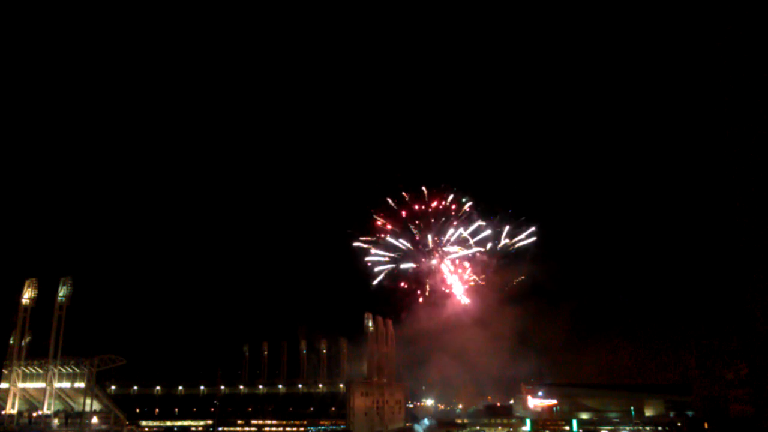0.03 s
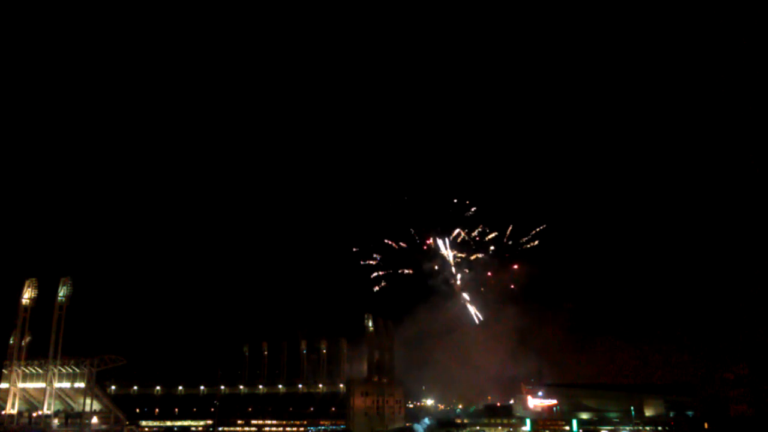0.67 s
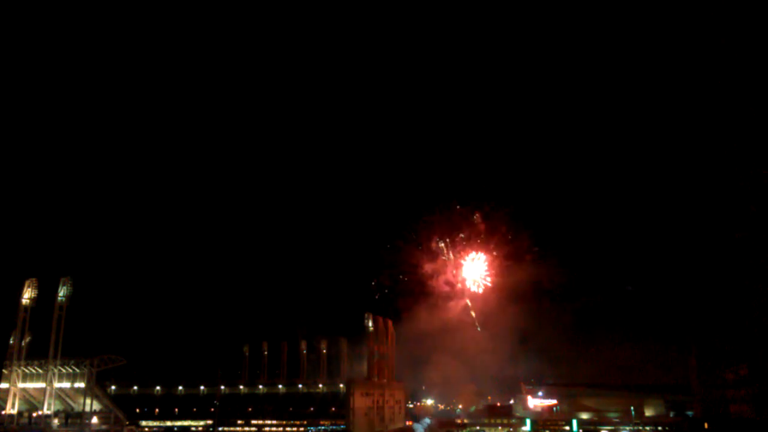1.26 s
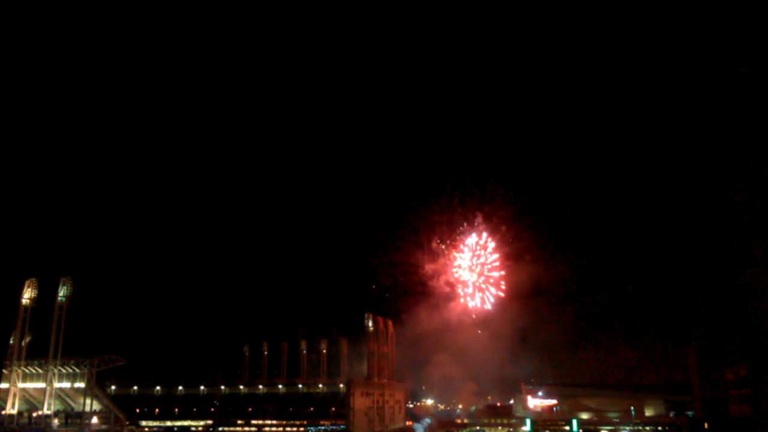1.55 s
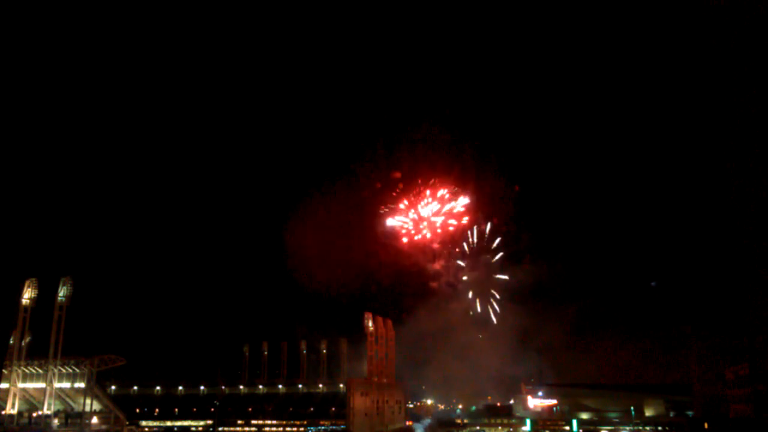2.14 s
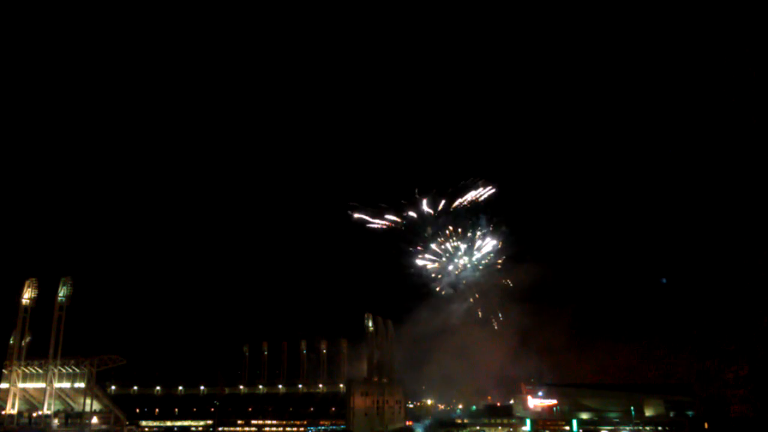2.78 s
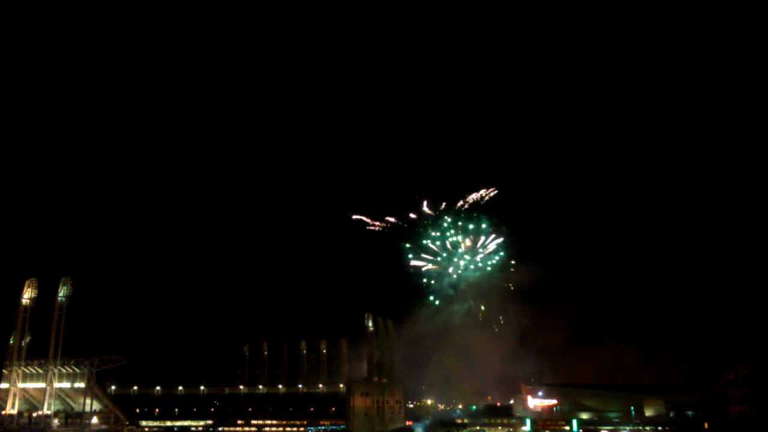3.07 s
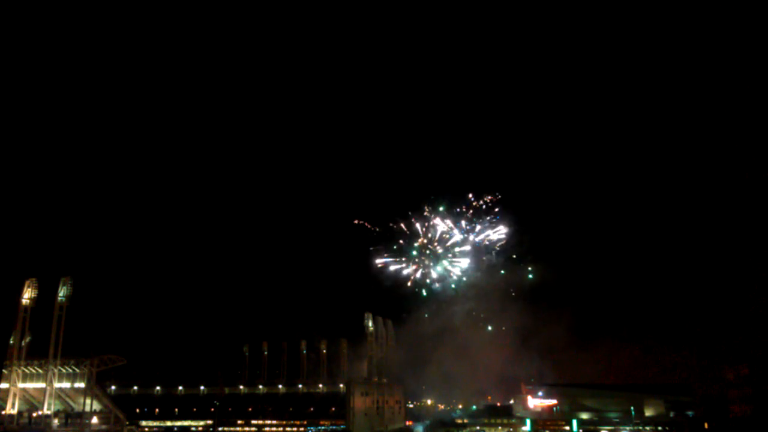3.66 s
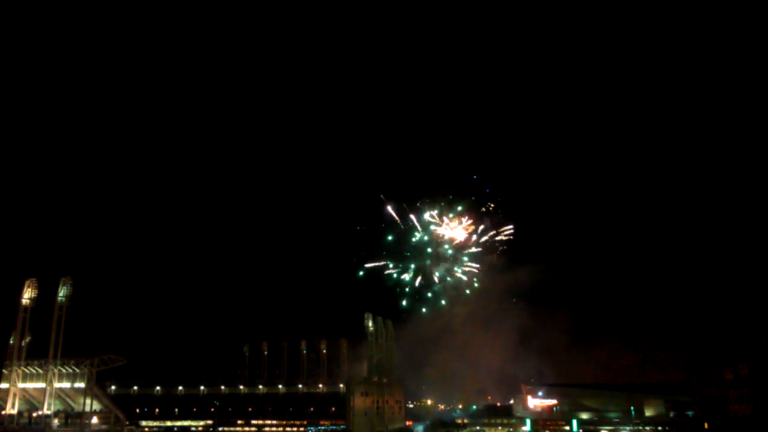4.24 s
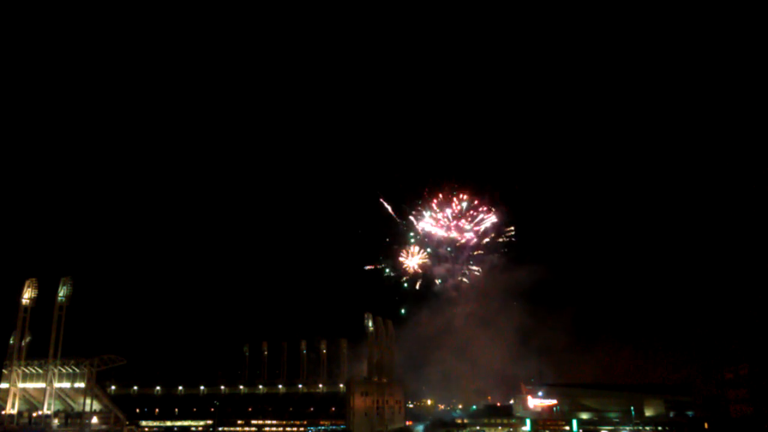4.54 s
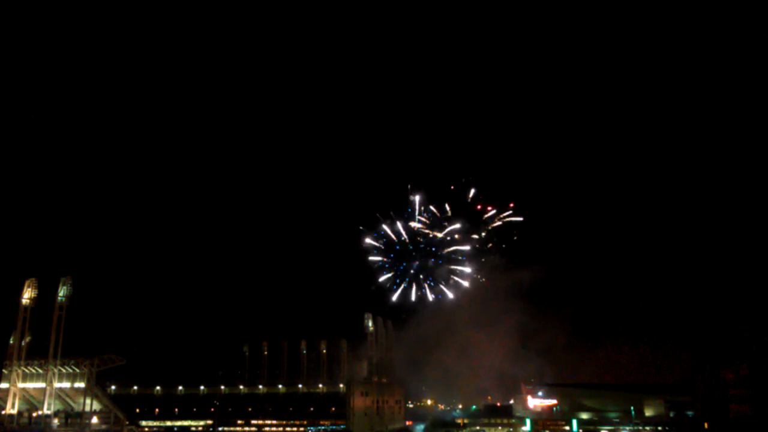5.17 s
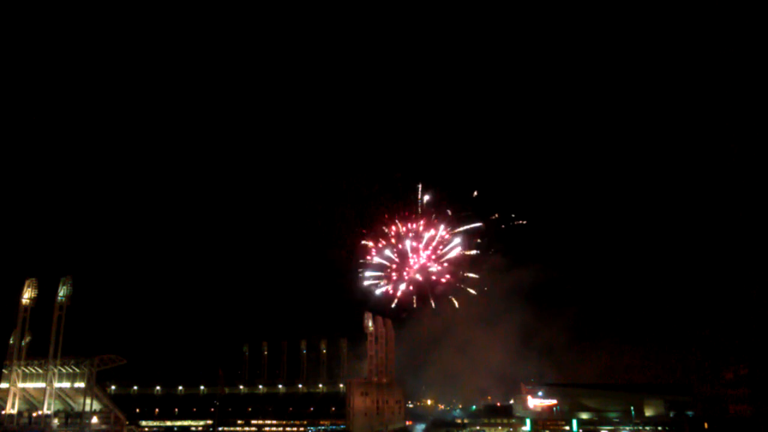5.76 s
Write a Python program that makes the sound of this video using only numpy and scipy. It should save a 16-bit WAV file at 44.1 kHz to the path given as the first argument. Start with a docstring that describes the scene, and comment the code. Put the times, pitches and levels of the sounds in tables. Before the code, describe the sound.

Heard from indoors, far-off aerial fireworks bang singly and in pairs, with fainter pops and echoes rumbling across the city.

```python
"""A room in a city at night, one microphone indoors, aerial shells bursting far off. Each bang rings briefly in
the room, overloads the microphone and slaps back from a nearby wall; then the city answers with a roll from the
near streets and later swells from far buildings. Fainter reports, smeared by the buildings, fall in between,
some of them late echoes of the bangs off far walls, and a thin high sizzle comes and goes."""
import sys
import numpy as np
from scipy import signal
from scipy.fft import rfft, irfft, next_fast_len
from scipy.io import wavfile
from scipy.ndimage import map_coordinates

SR = 44100
rng = np.random.default_rng(int(sys.argv[2]) if len(sys.argv) > 2 else 0)


def transcribe(signal):
    """Save signal, clipped to [-1, 1], as a 16-bit WAV file at the path in sys.argv[1]."""
    frames = np.atleast_2d(signal).T
    limited = np.clip(frames, -1, 1)
    pcm = np.round(limited * 32767).astype(np.int16)
    wavfile.write(sys.argv[1], SR, pcm)


N = 265041

# Distant shell bursts. Each row: start in seconds, level in dB before overload, t60 in seconds,
# ring pitch in Hz, its lift in dB, second ring in Hz, its lift in dB, room boom in dB, boom pitch in Hz,
# wall echo delay in seconds, echo gain in dB, tilt in dB per octave, bass lift in dB,
# crackle in dB, roll from the near streets in relative dB.
SHELL_BURSTS = [(0.0683, -4.5, 0.042, 571, 5.5, 1176, 8.5, -27, 618, 0.041, -3, 0.9, -6, -27, -21),
                (0.1228, -3.5, 0.057, 1577, 2.5, 2284, 4.5, -15, 496.8, .040, -15, 2, -3.5, -27.5, -18.5),
                (0.7750, -2.5, 0.05, 1070, 6.5, 2794, 4, -24.5, 616, 0.032, -4.5, 2.5, -0.5, -24, -18),
                (2.0983, -6.5, 0.074, 1204, 6, 610, 5.5, -19, 624, 0.037, -2, 3.5, 6.5, -28, -20.5),
                (2.5994, -3.5, 0.064, 1600, 10.5, 830, 8.5, -12.5, 421.2, 0.047, -13.5, 1.5, -2.5, -23.5, -19),
                (3.2239, 0, 0.06, 1087, 2.5, 2745, 4.5, -21, 608, .0385, -8, 2.5, 6.5, -24, -21),
                (3.9644, -3.5, 0.082, 826, 5.5, 1750, 0, -14, 530, 0.046, -13, 1.1, -2.5, -26.5, -19.5),
                (4.1524, -9, 0.097, 2340, 6.5, 1070, 3.5, -25, 619, .044, -6.5, 1, -0.5, -42.5, -22),
                (5.1030, -3.5, 0.055, 1113, 5.5, 1270, 4.5, -14.5, 603, .049, -14.5, 2.6, -2, -37, -18.5),
                (5.2436, -4.5, 0.07, 1797, 7, 456, 6, -15.5, 493, 0.046, -31, 0.1, -5, -33, -19.5)]
# Rolls from far buildings. Each row: start in seconds, hold in seconds, deep t60 in seconds,
# deep level in dB, bright t60 in seconds, bright level in dB.
FAR_ROLLS = [(0.34, 0.23, 2.2, -21, 1.8, -30.5), (0.988, 0.14, 3.1, -25.5, 4, -36.5),
             (2.203, 0.11, 1.7, -24.5, 1.7, -37), (2.828, 0.22, 2.5, -23, 5.2, -34.5),
             (3.425, 0.049, 5, -25, 5, -39.5), (4.2, 0.034, 3.65, -21.5, 3.2, -30),
             (5.445, 0.28, 1.33, -21.5, 1.2, -34.5)]
# Fainter reports, some of them late echoes of the bangs off far walls. Each row: start in seconds, level in dB,
# smear t60 in seconds, ring pitch in Hz, tilt in dB per octave, room boom in dB.
FAINT_REPORTS = [(0.051, -22, 0.022, 1100, -1, -29), (0.352, -23, 0.14, 1730, -5.5, -25),
                 (0.443, -23, 0.14, 1520, -3.5, -24.5), (0.522, -23, 0.12, 1680, -3, -37),
                 (0.564, -25.5, 0.11, 1100, 2, -51), (0.588, -18.5, 0.22, 1600, 0.5, -31),
                 (0.984, -25.5, 0.27, 1110, -1, -38), (1.134, -26, 0.094, 1600, -1, -40),
                 (1.548, -37.5, 0.11, 900, 0, -29), (1.6658, -28, 0.16, 1360, -1, -33),
                 (1.688, -27.5, 0.13, 1360, 1.5, -35.5), (1.888, -29, 0.14, 1400, -3.5, -50),
                 (2.867, -29, 0.05, 1500, -1, -41), (2.895, -18.5, 0.33, 920, -3, -29),
                 (2.94, -26.5, 0.089, 1000, -0.5, -31), (3.0043, -32, 0.093, 904, -8.5, -25.5),
                 (3.081, -22.5, 0.18, 1510, -2, -41), (3.438, -23.5, 0.3, 1060, -1.5, -25),
                 (3.854, -25.5, 0.11, 2130, 10, -22), (3.8618, -25, 0.085, 2100, 6.5, -41),
                 (4.2965, -35.5, 0.062, 1123, 2, -27), (4.349, -19.5, 0.14, 1490, -9.5, -32),
                 (4.401, -28.5, 0.046, 1090, -6, -23), (4.727, -22.5, 1, 1490, -1.5, -47),
                 (4.9458, -27.5, 0.22, 1080, -1, -34), (5.56, -23, 0.34, 1430, -3.5, -14),
                 (5.676, -30, 0.03, 1420, -5.5, -42.5), (5.733, -22.5, 0.13, 870, 1, -35),
                 (5.866, -36, 0.06, 1100, -9, -48), (5.9855, -28, 0.1, 1380, -2.5, -40)]
# Spells of high sizzle. Each row: start in seconds, hold in seconds, level in dB.
SIZZLE_SPELLS = [(0.065, 0.065, -42), (0.228, 0.0063, -52.5), (0.291, 0.0071, -49.5), (0.434, 0.016, -35),
                 (0.868, 0.09, -47.5), (0.97, 0.125, -35), (1.149, 0.13, -49), (1.164, 0.05, -29.5),
                 (1.362, 0.009, -43.5), (1.379, 0.011, -38), (1.876, 0.044, -37.5), (2.23, 0.073, -32),
                 (2.32, 0.11, -31.5), (2.416, 0.085, -32.5), (2.507, 0.12, -33.5), (2.605, 0.035, -29.5),
                 (2.664, 0.037, -42), (2.724, 0.017, -46), (2.776, 0.011, -46), (2.804, 0.013, -55.5),
                 (2.873, 0.0091, -48.5), (2.936, 0.011, -47.5), (3.871, 0.024, -38), (3.923, 0.05, -32.5),
                 (4.212, 0.019, -51.5), (4.865, 0.015, -33), (4.929, 0.015, -33.5), (5.206, 0.014, -33.5),
                 (5.869, 0.06, -33)]
# Resonances of the room around the microphone. Each row: centre in Hz, width in Hz, lift in dB.
ROOM_MODES = [(218.4, 23, 2.5), (245.3, 7.5, 7), (267.4, 7, 10.5), (367.2, 17, 7), (428, 31.7, 5.5),
              (496.4, 18, 10), (574, 66, 5.5), (684, 29, -5), (1075, 40, 4), (1248, 38, 4.5),
              (1346, 45, -5.5), (1507, 158, 7.5), (1748, 110, 8), (1987, 85, 5), (2282, 110, 5),
              (2630, 50, 2)]

# The tone of each sound from indoors. Each row: frequency in Hz, relative level in dB.
DEEP_ROLL_TONE = [(25, -80.5), (50, -43), (75, -41), (110, -30), (150, -16), (195, -14), (245, -3),
                  (310, -1.5), (400, 3.5), (520, -8), (650, -4), (850, -12.5), (1400, -70.5), (4000, -86.5)]
BRIGHT_ROLL_TONE = [(60, -74.5), (350, -27), (700, 4), (1100, 1.5), (1350, -2.5), (1600, -8), (2100, -9.5),
                    (3000, -14), (4000, -29), (5500, -64), (12000, -95.5)]
SIZZLE_TONE = [(3000, -77), (7500, -53.5), (9000, -24.5), (11500, -10.5), (12700, -1.5), (13900, 8.5),
               (15300, -1.5), (16200, -6.5)]
HISS_TONE = [(3000, -13), (7500, -24), (10500, -19), (12500, -11), (14200, 9), (15000, -11.5),
             (16200, -15.5)]
DULL_TONE = [(100, -49), (400, 4.5), (900, 7.5), (1600, -1.5), (2900, -9), (4000, -26.5), (5500, -58),
             (9000, -74)]  # faint reports and the tails of bangs
BLAST_TONE = [(25, -69), (60, -18), (100, -11.5), (200, -5.5), (380, -2.5), (550, 5), (720, 1.5),
              (1100, -2.5), (1800, -9.5), (2800, -13), (4000, -25), (5600, -41.5), (12000, -85.5)]
WALL_ECHO_TONE = [(40, -61), (120, -16), (380, -10), (560, 3), (1000, 0.5), (1800, -15), (2900, -11),
                  (4000, -22), (5500, -60.5), (9000, -85)]
CRACKLE_TONE = [(600, -42), (2000, -1), (3200, 5), (5000, -4), (8000, -12), (12000, -18), (16000, -33)]


def amp(db):
    """Decibels to gain."""
    return 10 ** (np.asarray(db) / 20)


def unit(x):
    """x at rms 1."""
    return x / np.sqrt(np.mean(x ** 2) + 1e-20)


def unit_energy(x):
    """x with as much energy as 10 ms at rms 1."""
    return x / np.linalg.norm(x) * np.sqrt(SR / 100)


def fade(t, t60):
    """A decay of 60 dB in t60 seconds."""
    return np.exp(-np.log(1000) * t / t60)


def swell(t, rise, hold, t60):
    """An envelope from t = 0 that rises, holds and dies away; times in seconds."""
    return np.clip(t / rise, 0, 1) * fade(np.maximum(t - rise - hold, 0), t60)


def wobble(rate):
    """A smooth random curve of rms 1, rate knots a second."""
    knots = rng.standard_normal(int(N * rate / SR) + 4)
    return unit(map_coordinates(knots, [np.arange(N) * rate / SR]))


def add(track, start, sound):
    """Mix a sound into the track, start seconds in."""
    rest = track[max(round(start * SR), 0):]
    rest[:len(sound)] += sound[:len(rest)]


def tilted(tone, tilt_db):
    """A tone tilted by tilt_db per octave above 600 Hz."""
    return [(hz, db + tilt_db * np.log2(max(hz / 600, 1))) for hz, db in tone]


def coloured(x, tone, resonances=()):
    """x through a causal filter: a broad tone with resonant peaks on it."""
    size = 2 * next_fast_len(len(x) // 2 + 4096)
    hz = np.fft.rfftfreq(size, 1 / SR)
    tone_hz, tone_db = np.transpose(tone)
    db = np.interp(np.log(hz + 1), np.log(tone_hz + 1), tone_db)
    db += sum(lift / (1 + (2 * (hz - centre) / width) ** 2) for centre, width, lift in resonances)
    # Minimum phase: nothing rings before it is struck.
    cepstrum = irfft(np.log(amp(db)), size)
    cepstrum[1:size // 2] *= 2
    cepstrum[size // 2 + 1:] = 0
    return irfft(rfft(x, size) * np.exp(rfft(cepstrum)), size)[:len(x)]


def patter(rate, spread_db, t60, steady):
    """White noise in uneven puffs, rate a second, each starting sharply and dying onto a steady bed."""
    starts = (rng.random(N) < rate / SR) * amp(spread_db * rng.uniform(-1.7, 1, N)) ** 2
    puff = fade(np.arange(SR // 4) / SR, t60) ** 2
    power = np.abs(signal.fftconvolve(starts, puff)[:N])
    return rng.standard_normal(N) * np.sqrt(power / power.mean() + steady)


def roll(far_dbs, far_t60s, far_rise, near_db, near_rise, near_hold, near_t60,
         earlier_db, earlier_t60, floor_db):
    """Strength of the echoes: near and far rolls over earlier shells dying away and the steady city."""
    t = np.arange(0, N, 64) / SR
    power = amp(floor_db) ** 2 + (amp(earlier_db) * fade(t, earlier_t60)) ** 2
    for start, *_, db in SHELL_BURSTS:
        power += (amp(db + near_db) * swell(t - start, near_rise, near_hold, near_t60)) ** 2
    for (start, hold, *_), db, t60 in zip(FAR_ROLLS, far_dbs, far_t60s):
        power += (amp(db) * swell(t - start, far_rise, hold, t60)) ** 2
    return np.interp(np.arange(N) / SR, t, np.sqrt(power))


def city_rumble():
    """Countless echoes reach the room: a deep roll and a brighter scatter, mostly from far off."""
    deep = coloured(patter(rate=110, spread_db=-0.5, t60=0.2, steady=0.34), DEEP_ROLL_TONE, ROOM_MODES)
    scatter = patter(rate=160, spread_db=3.5, t60=0.29, steady=0.056)
    bright = coloured(scatter, BRIGHT_ROLL_TONE, ROOM_MODES)
    *_, deep_t60s, deep_dbs, bright_t60s, bright_dbs = np.transpose(FAR_ROLLS)
    deep_roll = roll(deep_dbs, deep_t60s, far_rise=0.059,
                     near_db=-1, near_rise=0.028, near_hold=0.069, near_t60=0.98,
                     earlier_db=-19, earlier_t60=0.69, floor_db=-34.5)
    bright_roll = roll(bright_dbs, bright_t60s, far_rise=0.02,
                       near_db=-13.5, near_rise=0.0044, near_hold=0.057, near_t60=0.91,
                       earlier_db=-28, earlier_t60=0.85, floor_db=-41)
    return deep_roll * unit(deep) + bright_roll * unit(bright)


def high_sizzle(hiss_db, whine_hz, whine_db):
    """A very high sizzle flares in short spells over a faint steady hiss and a wavering whine."""
    t = np.arange(N) / SR
    flare_power = sum((amp(db) * swell(t - start, rise=0.004, hold=hold, t60=0.045)) ** 2
                      for start, hold, db in SIZZLE_SPELLS)
    flutter = unit(amp(2.8 * wobble(rate=70)))
    fizz = unit(coloured(patter(rate=200, spread_db=12, t60=0.015, steady=0.67), SIZZLE_TONE))
    hiss = amp(hiss_db) * unit(coloured(rng.standard_normal(N), HISS_TONE))
    phase = 2 * np.pi * np.cumsum(whine_hz + 2 * wobble(rate=14)) / SR
    whine = amp(whine_db + 2.5 * wobble(rate=25)) * np.sin(phase)
    return np.sqrt(flare_power) * flutter * fizz + hiss + whine


def reflections(tone, resonances, attack, t60, hold=0):
    """A dense cluster of reflections that swells, holds and dies; times in seconds."""
    t = np.arange(SR // 3) / SR
    envelope = (1 - np.exp(-t / attack)) * fade(np.maximum(t - hold, 0), t60)
    return unit_energy(coloured(envelope * rng.standard_normal(len(t)), tone, resonances))


def faint_reports():
    """Reports that reach the microphone only by detours: a soft pop, a smear and a boom in the room."""
    out = np.zeros(N)
    for start, db, t60, ring_hz, tilt_db, boom_db in FAINT_REPORTS:
        tone = tilted(DULL_TONE, tilt_db)
        resonances = ROOM_MODES + [(ring_hz, 400, 5)]
        pop = amp(-5) * reflections(tone, resonances, attack=0.001, t60=0.04)
        smear = amp(0.5) * reflections(tone, resonances, attack=0.001, t60=t60)
        add(out, start, amp(db) * (pop + smear))
        add(out, start, amp(boom_db) * room_boom(start_hz=366, detune=0.087, rough=1.7, sinks_to=0.85))
    return out


def room_boom(start_hz, detune, rough, sinks_to=0.59):
    """A rough low ring that sinks to a share of its pitch as the lower room resonances take over."""
    t = np.arange(SR // 3) / SR
    glide = sinks_to + (1 - sinks_to) * np.exp(-t / 0.0334)
    hz = start_hz * glide * (1 + detune * rng.standard_normal())
    knots = rng.standard_normal((2, 100))
    grain = map_coordinates(knots[0], [t * 160]) + 1j * map_coordinates(knots[1], [t * 160])
    cycles = np.cumsum(hz) / SR + rng.random()
    wave = np.real((1 + rough * grain) * np.exp(2j * np.pi * cycles))
    return swell(t, rise=0.02, hold=0.035, t60=0.098) * wave / np.sqrt(1 + 2 * rough ** 2)


def shock_wave(tone, rings, attack, hold, t60, tail_db, tail_t60):
    """One shock wave entering the room: a crack, then a duller tail as the walls soak up the treble."""
    crack = reflections(tone, ROOM_MODES + rings, attack, t60, hold)
    tail = reflections(DULL_TONE, ROOM_MODES, attack=0.012, t60=tail_t60)
    return crack + amp(tail_db) * tail


def crackle(ticks_per_s=230):
    """A brief, gritty treble crackle on each overloaded bang."""
    t = np.arange(SR // 10) / SR
    ticks = (rng.random(len(t)) < ticks_per_s / SR) * rng.standard_normal(len(t))
    grit = unit(ticks) + 0.6 * rng.standard_normal(len(t))
    return unit_energy(coloured(grit * swell(t, rise=0.0025, hold=0.0085, t60=0.045), CRACKLE_TONE))


def shell_bangs():
    """Each far burst arrives directly, then duller off a nearby wall; both arrivals boom in the room."""
    out = np.zeros(N)
    for (start, db, t60, ring_hz, ring_db, second_hz, second_db, boom_db, boom_hz,
         delay, echo_db, tilt_db, bass_db, crackle_db, _) in SHELL_BURSTS:
        rings = [(ring_hz, 130, ring_db), (second_hz, 150, second_db)]
        tone = [(hz, level + bass_db * (hz < 250)) for hz, level in tilted(BLAST_TONE, tilt_db)]
        direct = shock_wave(tone, rings, attack=0.00025, hold=0.0029, t60=t60,
                            tail_db=-12.5, tail_t60=0.23)
        echo = shock_wave(WALL_ECHO_TONE, rings, attack=0.00082, hold=0.002, t60=0.079,
                          tail_db=-28.5, tail_t60=0.95)
        add(out, start, amp(db) * direct + amp(boom_db) * room_boom(boom_hz, detune=0.02, rough=0.78))
        add(out, start, amp(crackle_db) * crackle())
        # The wall echo crackles much more faintly.
        add(out, start + delay, amp(crackle_db + echo_db - 17.5) * crackle())
        echo_boom = amp(boom_db) * room_boom(boom_hz, detune=0.025, rough=0.7)
        add(out, start + delay, amp(echo_db) * (amp(db) * echo + echo_boom))
    return out


def scene():
    """Bangs, fainter reports, rumble and sizzle meet at one microphone in the room."""
    fireworks = shell_bangs() + faint_reports() + city_rumble()
    return (fireworks + high_sizzle(hiss_db=-59.5, whine_hz=14213, whine_db=-58))[None]


def record(dry):
    """The microphone flattens the peaks of the bangs; the deepest bass and highest treble are cut."""
    ceiling, hardness = 0.72, 8
    low_cut_hz, top_hz = 48, 16000
    clipped = dry / (1 + np.abs(dry / ceiling) ** hardness) ** (1 / hardness)
    size = next_fast_len(N + SR // 2)
    hz = np.fft.rfftfreq(size, 1 / SR)
    passband = hz ** 4 / (hz ** 4 + low_cut_hz ** 4) * (hz < top_hz)
    return irfft(rfft(clipped, size) * passband, size)[..., :N]


dry = scene()
out = record(dry)
transcribe(out)
```